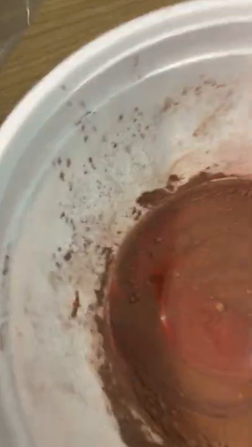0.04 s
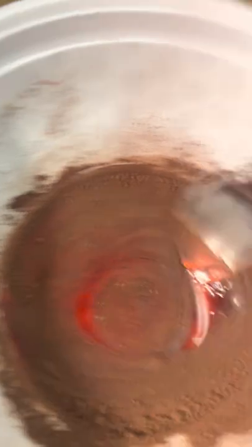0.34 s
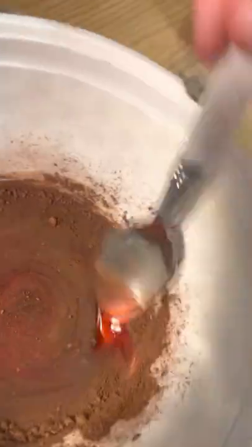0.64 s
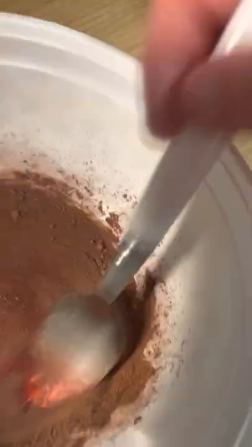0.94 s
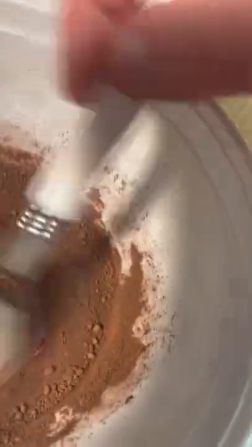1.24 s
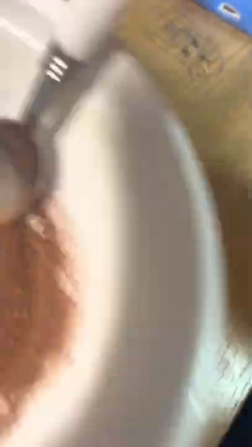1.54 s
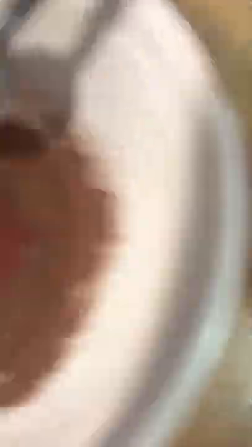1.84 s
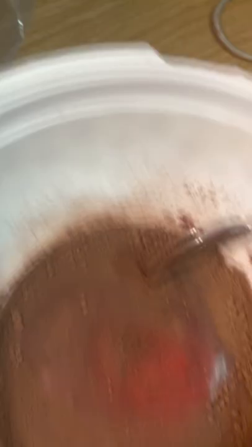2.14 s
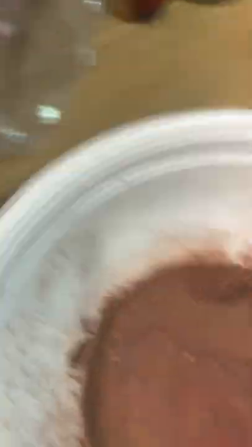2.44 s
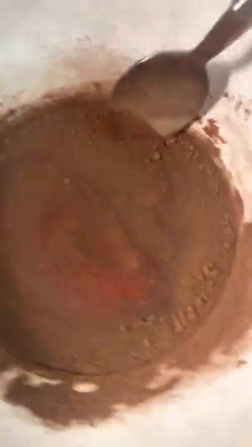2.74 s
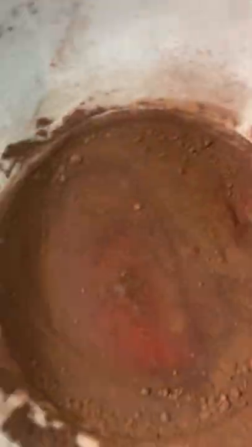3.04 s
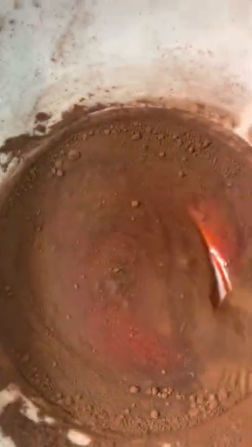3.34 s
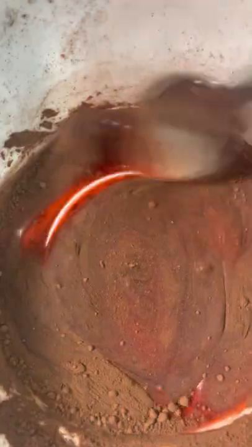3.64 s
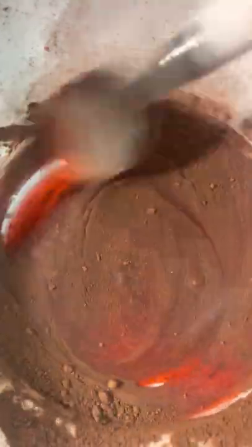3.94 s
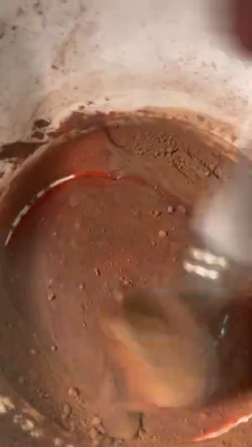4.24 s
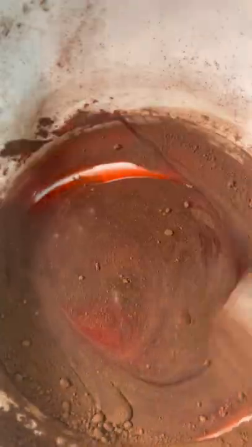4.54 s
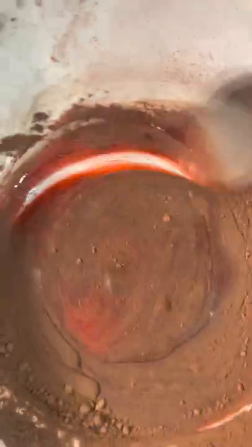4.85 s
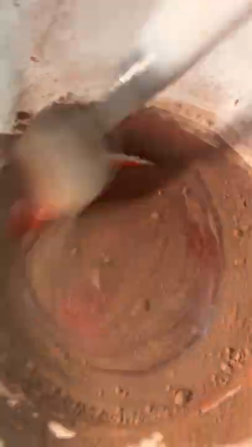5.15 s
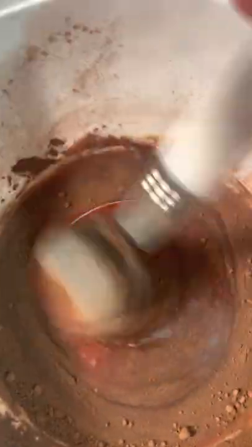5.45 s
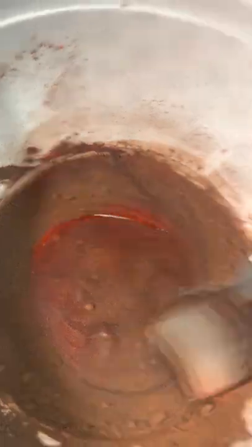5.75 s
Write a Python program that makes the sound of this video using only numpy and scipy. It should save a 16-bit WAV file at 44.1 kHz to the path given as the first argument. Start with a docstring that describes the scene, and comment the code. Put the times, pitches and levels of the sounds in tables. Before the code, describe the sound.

Close, uneven tapping and scraping of a spoon against a thin plastic bowl as it mixes cocoa powder into a paste.

```python
"""A faintly humming kitchen, close up: a metal spoon stirs cocoa powder into a thick paste in a thin
plastic bowl. Each knock runs through the wall as a bending wave, treble first, a short falling "tock",
and some set the bowl rocking. Between knocks, in short pushes, the spoon grinds over powder and drags
along the wall, while air pockets in the paste crackle and gulp."""
import sys
import numpy as np
from scipy import signal
from scipy.fft import rfft, irfft, next_fast_len
from scipy.io import wavfile
from scipy.ndimage import uniform_filter1d, map_coordinates

SR = 44100
rng = np.random.default_rng(int(sys.argv[2]) if len(sys.argv) > 2 else 0)


def output_pcm(signal):
    """Save a mono or channel-first signal as 16-bit PCM at the path in sys.argv[1].

    Samples are clipped to [-1, 1] before scaling.
    """
    pcm = np.clip(np.atleast_2d(signal).T, -1, 1) * 32767
    wavfile.write(sys.argv[1], SR, np.round(pcm).astype(np.int16))


N = 255780  # 5.8 s
TIME_S = np.arange(N) / SR


def amp(db):
    """Decibels to gain."""
    return 10 ** (np.asarray(db) / 20)


def unit(x):
    """Scale to rms 1."""
    return x / np.sqrt(np.mean(x ** 2) + 1e-20)


def along(points, hz):
    """Read (frequency, value) points on a log axis."""
    freqs, values = np.transpose(points)
    return np.interp(np.log(hz + 1), np.log(freqs + 1), values)


def wobble(rate_hz):
    """Smooth random curve, rate_hz knots a second."""
    return map_coordinates(rng.standard_normal(int(N * rate_hz / SR) + 4), [TIME_S * rate_hz])


def filtered(x, response):
    """Apply a complex frequency response."""
    size = next_fast_len(N + SR // 2)
    return irfft(rfft(x, size) * response(np.fft.rfftfreq(size, 1 / SR)), size)[..., :N]


def band(hz, lo_hz, hi_hz, order=4):
    """Band-pass gain with smooth skirts."""
    return ((1 + (lo_hz / (hz + 1)) ** (2 * order)) * (1 + (hz / hi_hz) ** (2 * order))) ** -.5


def resonance(hz, centre_hz, q):
    """Gain of one damped resonance."""
    ratio = (hz + 1) / centre_hz
    return (1 + (q * (ratio - 1 / ratio)) ** 2) ** -.5


def causal(gain):
    """Minimum-phase response with this gain."""
    cepstrum = irfft(np.log(np.maximum(gain, 1e-6)))
    half = len(cepstrum) // 2
    return np.exp(rfft(np.r_[cepstrum[0], 2 * cepstrum[1:half], np.zeros(half)]))


def bending(hz, delay_s):
    """Bending-wave path: speed goes as the root of frequency; delay_s holds at 1 kHz."""
    return np.exp(-4j * np.pi * delay_s * np.sqrt(1000 * hz))


def add(track, start_s, sound):
    """Mix a sound into a track."""
    part = track[max(round(start_s * SR), 0):][:len(sound)]
    part += sound[:len(part)]


def bump(db, hz, rise_s, t60_s):
    """Soft tone that swells and dies."""
    t = np.arange(SR // 3) / SR
    return amp(db - 60 * t / t60_s) * (1 - np.exp(-(t / rise_s) ** 2)) * np.sin(2 * np.pi * hz * t)


def pushes(rows, arch_db=0.5):
    """Gain curve: each push builds, arches as it swells or eases, then fades; slopes in s per 20 dB."""
    track = np.zeros(SR + N)  # 1 s of lead-in
    for start_s, length_s, db, swell_db, rise_s, fade_s in rows:
        t = np.arange(-3 * rise_s, length_s + 3 * fade_s, 1 / SR)
        progress = np.clip(t / length_s, 0, 1)
        body_db = swell_db * (progress - .5) + arch_db * (np.sin(np.pi * progress) - .5)
        skirt_db = -20 * (np.maximum(-t, 0) / rise_s + np.maximum(t - length_s, 0) / fade_s)
        add(track, 1 + start_s - 3 * rise_s, amp(db + body_db + skirt_db))
    return track[SR:]


# Room noise spectrum: (frequency [Hz], level [dB])
AIR_SPECTRUM = [(25, -17), (52, -3), (120, -4), (180, -6.5), (280, -14), (800, -34.5), (2200, -39),
                (8000, -61)]


def kitchen(hum_hz=57, hum_db=-47, air_db=-38):
    """Low room noise and the wavering hum of an appliance."""
    air = unit(filtered(rng.standard_normal(N), lambda hz: amp(along(AIR_SPECTRUM, hz))))
    phase = 2 * np.pi * hum_hz * TIME_S + 0.8 * wobble(4.03)
    return amp(air_db) * air + amp(hum_db + 1.1 * wobble(4.4)) * np.sin(phase)


def reverb(x, t60_s=0.16):
    """Room reflections: a short noise tail after a 4 ms gap."""
    t = np.arange(SR // 2) / SR
    tail = rng.standard_normal(len(t)) * amp(-60 * t / t60_s) * (t > .004)
    return signal.fftconvolve(x, tail / np.linalg.norm(tail))[:N]


def shove(start_s=1.535, length_s=0.06254, db=-26, rise_s=0.015, fade_s=0.12):
    """The hardest push shifts the bowl: its base judders over the table."""
    judder = unit(filtered(rng.standard_normal(N), lambda hz: band(hz, 55, 150)))
    return pushes([(start_s, length_s, db, 0, rise_s, fade_s)]) * judder


# Landings that rock the bowl: (time [s], level [dB])
ROCKS = [(0.212, -17.5), (0.864, -23), (1.14, -17), (3.234, -16.5), (3.781, -15), (4.226, -14), (4.63, -11),
         (4.999, -16), (5.462, -15.5)]


def rocking(rock_hz=102.2):
    """The bowl sways after the spoon lands."""
    track = np.zeros(N)
    for start_s, db in ROCKS:
        add(track, start_s, bump(db, rock_hz, rise_s=0.016, t60_s=0.18))
    return track


# Pockets opening behind the spoon: (time [s], level [dB], pitch [Hz])
GULPS = [(0.763, -22.5, 533), (1.646, -13.5, 425), (2.239, -13.5, 250), (2.69, -15, 396.5),
         (3.686, -21, 696), (4.397, -25, 618), (4.88, -22, 610)]


def gulps():
    """Large air pockets ring briefly as the paste lets go."""
    track = np.zeros(N)
    for start_s, db, hz in GULPS:
        add(track, start_s, bump(db, hz, rise_s=0.00261, t60_s=0.063))
    return track


def pops(rate_hz=85, centre_hz=2200, spread=.38, decay_cycles=2.2):
    """Small air pockets open in the sticky paste; each rings a few cycles at its own pitch."""
    track, t = np.zeros(N), np.arange(512) / SR
    count = int(rate_hz * N / SR)
    for start_s, (pitch, strength) in zip(rng.uniform(0, N / SR, count), rng.standard_normal((count, 2))):
        cycles = centre_hz * np.exp(spread * pitch) * t
        envelope = np.exp(spread * np.tanh(strength) - cycles / decay_cycles)
        add(track, start_s, envelope * np.sin(2 * np.pi * cycles))
    return unit(track)


def fizz_gain(stop_s=5.5):
    """Once well stirred, the paste fizzes faintly: a gain that creeps up, then stops."""
    return amp(np.interp(TIME_S, (0, 5, stop_s), (-114.25, -64.25, -62.3))) * (TIME_S < stop_s)


# Bowl peaks and dips, before and after the turn: (frequency [Hz], gain [dB])
EARLY_RINGS = [(1250, 2.5), (1620, 3), (1980, -4), (2400, 2), (2650, 2), (3590, 3), (4280, 5), (5700, 6),
               (6600, 3), (7380, 3)]
LATE_RINGS = [(1610, 5), (2000, -8), (2400, -1), (3160, 6), (4000, 7), (5740, 6), (6680, 4.5), (7400, 4)]


def bowl_colour(x, width_hz=210, turn_s=(2.3, 2.9765)):
    """Bowl resonances colour knocks and scrapes; they crossfade as the spoon is taken round."""
    def ringing(rings):
        def response(hz):
            peaks_db = sum(db / (1 + (2 * (hz - ring_hz) / width_hz) ** 2) for ring_hz, db in rings)
            return causal(amp(peaks_db - 1.5))
        return filtered(x, response)

    late = np.interp(TIME_S, turn_s, (0, 1))
    return (1 - late) * ringing(EARLY_RINGS) + late * ringing(LATE_RINGS)


# Rubbing spectrum: (frequency [Hz], density [dB])
RUB_SPECTRUM = [(120, -13.5), (300, 6), (500, 4.5), (1050, -2.5), (1900, -14), (2400, -0.5), (3100, -5),
                (3700, -11.5), (4800, -11), (10500, -4), (14000, -5.5)]


def friction(lo_hz, hi_hz, rate_hz, spread_db, rub_gain, flutter_db, patchy_db, tone=None):
    """Tiny uneven slips on a smooth rub, radiated through the wall."""
    def wall(hz):
        return causal(amp(along(RUB_SPECTRUM, hz)) * band(hz, lo_hz, hi_hz)) * bending(hz, 0.001175)

    slips = (rng.random(N) < rate_hz / SR) * rng.standard_normal(N)
    slips *= amp(spread_db * np.clip(rng.standard_normal(N), -2, 2))
    force = (unit(slips) + rub_gain * rng.standard_normal(N)) * amp(flutter_db * wobble(110))
    # resonances shift as the contact point travels
    hz, frame_s, spectra = signal.stft(force, SR, nperseg=512)
    patches = uniform_filter1d(rng.standard_normal(spectra.shape), 4, axis=0)
    patches = uniform_filter1d(patches, 9, axis=1)
    spectra *= amp(patchy_db * unit(patches))
    if tone:
        peak = resonance(hz[:, None], np.interp(frame_s, *np.transpose(tone)), q=0.95)
        spectra *= peak / np.linalg.norm(peak, axis=0)
    force = signal.istft(spectra, nperseg=512)[1][:N]
    return unit(filtered(force, wall))


# Main wall resonance under the dragging spoon: (time [s], frequency [Hz])
DRAG_TONE = [(1.2, 637.6), (1.52, 860), (1.62, 515), (1.72, 337), (2.06, 765), (2.13, 1116), (2.26, 450),
             (2.39, 710), (2.6, 503), (2.7, 400), (2.92, 435), (3.0, 825.2), (3.6, 730), (5.3, 710)]
# Spoon pushes: (start [s], length [s], level [dB], drag offset [dB], hiss offset [dB],
# swell [dB], rise [s per 20 dB], fade [s per 20 dB])
STROKES = [(0.0, 0.15, -48.5, -8, 0.5, 4, .03, 0.023), (0.297, 0.0274, -41.5, 2.5, -2, -4, .01, 0.066),
           (0.412, 0.11, -43, -8.5, -1, 0.5, 0.042, 0.045),
           (0.629, 0.04947, -38.5, 0, -8.5, -7.5, 0.013, 0.15),
           (0.753, 0.066, -37.5, 3.5, -3, 8, 0.05105, 0.11126),
           (0.962, 0.03, -33.5, -3, -5.5, -4, 0.024, 0.04636),
           (1.04, 0.04626, -51.5, -7, -3.5, 20, .04, 0.011),
           (1.135, 0.076, -31.5, -10, -5, 7.5, 0.013, 0.032),
           (1.322, 0.031, -29.5, -1, -9, 0, 0.059, 0.076), (1.48, 0.15, -29.5, 7.5, -11.5, 0, .05, 0.076),
           (2.076, 0.09, -29.5, 14, -9.5, 0, 0.055, 0.063), (2.313, .075, -36, -11, 2, 11, 0.1, 0.024),
           (2.385, .018, -33, 6, -8, 0, .03, .03), (2.499, 0.21, -40, 14, -3.5, 3.5, 0.054, .055),
           (2.889, 0.04659, -39.5, 9.5, -4.5, 5, 0.057, 0.021),
           (2.989, 0.018, -39, 8.5, -13, 2.5, 0.038, 0.014), (3.247, 0.076, -55.5, -7.5, 7, 0, .01, 0.15),
           (3.345, .008, -33, 3, -6, 2, 0.023, .008), (3.37, .045, -42, 5, -2, -3, .01, .03),
           (3.465, 0.073, -38, 2.5, 4, -9, 0.03, .05), (3.596, 0.07, -32.5, -3, -1.5, -3.5, .03, 0.04),
           (3.736, 0.00712, -33.5, -1, -4, 6.5, 0.02291, 0.006045),
           (3.803, 0.12, -39.5, -1, 5.5, 6, 0.022, 0.17), (3.998, 0.14, -38, 0.5, -14, -10.5, .03, .045),
           (4.264, .105, -41, 6, -2, -6, 0.038, 0.098), (4.413, 0.1, -36, -0.5, -5, 1, 0.053, 0.0067),
           (4.693, 0.21, -39.5, 4, -2.5, 2, 0.11, 0.022), (5.072, 0.042, -39, 2.5, 1, 0, 0.096, 0.01),
           (5.154, .125, -34.5, 5, -5.5, -7.5, 0.012, .08), (5.51, 0.074, -33, -1, -5, -3, 0.021, 0.075),
           (5.644, 0.036, -40, -1.5, -13, -9.5, 0.012, .018),
           (5.754, 0.03, -31.5, 0.5, -10, 0.5, 0.0046, 0.18)]


def stirring(drag_linger=1.18, crackle_duck=.8):
    """The spoon drags on the wall, scrapes over grit, shears dry powder and tears sticky paste."""
    start_s, length_s, db, drag_db, hiss_db, swell_db, rise_s, fade_s = np.transpose(STROKES)

    def gain(offset_db, linger=1):
        return pushes(zip(start_s, length_s, db + offset_db, swell_db, rise_s, fade_s * linger))

    drag = friction(165, 1830, rate_hz=500, spread_db=2, rub_gain=.91, flutter_db=1.5, patchy_db=1,
                    tone=DRAG_TONE)
    scrape = friction(1250, 4600, rate_hz=450, spread_db=3.5, rub_gain=.7, flutter_db=2.8, patchy_db=2.8)
    hiss = friction(3640, 20940, rate_hz=1400, spread_db=3.5, rub_gain=.91, flutter_db=3, patchy_db=5.5)
    fizz = fizz_gain()
    crackle_db = -4 - crackle_duck * np.maximum(drag_db, 0)  # heavy drag, less crackle
    return (gain(drag_db - 1.6, drag_linger) * drag
            + (gain(-2.3) + fizz) * scrape
            + (gain(hiss_db + 3) + fizz) * hiss
            + gain(crackle_db) * pops())


def contact(knock_db, clack_db, tick_db, knock_hz, clack_hz, travel_s=.0011, rim_gain=0.68, size=4096):
    """One contact sends a falling chirp through the wall; weaker ones return from the rim."""
    hz, t = np.fft.rfftfreq(size, 1 / SR), np.arange(size) / SR
    path_s = travel_s * np.exp(0.1694 * rng.standard_normal())
    waves = bending(hz, path_s) + rim_gain * bending(hz, path_s * rng.uniform(2.406, 3.0))
    waves += rim_gain ** 2 * bending(hz, path_s * rng.uniform(4, 8))
    # a light, bright contact skids over grit
    grit = rng.standard_normal(size) * np.exp(-t / 0.0076)
    skid_db = 3 + tick_db - max(knock_db, clack_db)
    force = 1 + amp(skid_db) * rfft(grit / np.linalg.norm(grit))
    knock = (resonance(hz, knock_hz, q=4.2) + 0.23) * band(hz, 94, 950, order=3)
    # paste damps the spoon's ring within milliseconds; a softer contact has a lower top
    clack = resonance(hz, clack_hz, q=1.5) + resonance(hz, clack_hz, q=9)
    clack *= band(hz, 1150, 1.8 * clack_hz + 600)
    tick = band(hz, 4900, 12500) * resonance(hz, 6200, q=.6)
    # each part is scaled to its own energy
    parts = [(knock_db + 26, knock), (clack_db + 21.5, clack), (tick_db + 20.5, tick)]
    power = sum((amp(db) * shape / np.linalg.norm(irfft(shape * waves * force))) ** 2
                for db, shape in parts)
    return irfft(causal(np.sqrt(power)) * waves * force)


# Spoon on wall, relative levels:
# (time [s], wall knock [dB], spoon clack [dB], contact tick [dB], knock [Hz], clack [Hz])
KNOCKS = [(0.1915, -24.5, -26, -35, 493, 2970), (0.286, -22.5, -25, -31, 840, 2180),
          (0.5976, -22.5, -21.5, -35, 557.3, 4300), (0.6179, -18, -20.5, -45, 656, 2180),
          (0.8551, -19, -28, -38, 463, 3390), (0.9013, -17, -23.5, -38, 450, 1480),
          (0.9523, -21, -22, -42, 453, 1270), (1.1125, -24, -17, -24, 375, 2924),
          (1.5307, -10, -14, -26, 405.4, 2620), (1.5668, -7, -17, -24, 323, 2735),
          (1.6188, -15, -17.5, -22.5, 440, 2430), (1.9973, -13.5, -13, -19.5, 900, 2056),
          (2.0008, -11.5, -13.5, -28, 456.7, 3120), (2.236, -14.5, -18.5, -23.5, 930, 2042),
          (2.2405, -22.5, -29, -21.5, 341.1, 1610), (2.7654, -24, -16, -32, 750, 1850),
          (3.2266, -17, -24.5, -31, 500, 2480), (3.362, -5, -16, -24, 547, 3974),
          (3.4752, -21.5, -36, -45, 569, 2000), (3.5796, -23, -37, -28, 630, 1990),
          (3.7716, -15, -17, -29, 617, 2400), (3.8554, -8, -8.5, -29.5, 525, 1830),
          (3.9738, -22.5, -26.5, -33, 540, 1740), (3.9996, -24, -18, -29, 870, 1779),
          (4.0464, -25, -24.5, -39, 514.4, 1718), (4.121, -24, -26.5, -31.5, 580, 3750),
          (4.2171, -13, -19.5, -26.5, 506, 2044), (4.297, -21, -29.5, -51, 560, 1683),
          (4.336, -7.5, -20.5, -25, 837.3, 2250), (4.348, -16, -30, -38, 489.5, 2460),
          (4.6201, -19, -20, -27.5, 554, 2030), (4.6372, -19.5, -24, -23, 436, 2120),
          (4.6804, -9.5, -8.5, -24.5, 515, 1950), (4.7964, -27, -35, -44, 618, 2151),
          (4.9943, -18, -20, -35, 630, 2400), (5.0058, -23, -30, -38, 584, 1900),
          (5.0676, -9, -9, -32, 620, 1735), (5.2639, -19, -49.5, -65, 465.1, 2660),
          (5.4487, -18.5, -24, -36, 569.4, 1890), (5.4532, -24.5, -18.5, -38, 636, 1958),
          (5.4794, -23, -29, -31.5, 600, 1810)]
# Light clicks of the spoon's edge: (time [s], relative level [dB], clack [Hz])
CLICKS = [(0.0925, -26, 2514), (0.1447, -32, 5470), (0.1575, -25.5, 5140), (0.2968, -23.5, 2323),
          (0.813, -20.5, 2669), (0.8348, -22, 2020), (3.403, -25, 4170), (3.7797, -27, 2430),
          (3.829, -30, 7100), (4.654, -27, 4448), (4.8207, -25.5, 1430), (5.223, -21.5, 1940)]


def knocks():
    """Full knocks of the spoon, and edge clicks that hardly move the wall."""
    track = np.zeros(N)
    for start_s, *blow in KNOCKS:
        add(track, start_s, contact(*blow))
    for start_s, db, hz in CLICKS:
        click = contact(knock_db=db - 19.5, clack_db=db, tick_db=db - 11, knock_hz=800, clack_hz=hz)
        add(track, start_s, click)
    return track


# Left microphone over right: (frequency [Hz], level [dB])
BALANCE = [(200, 0), (500, -1.5), (1500, 0), (2900, -2), (3800, 0), (4800, -3), (5500, 0)]
# Left microphone ahead of right: (frequency [Hz], phase [rad])
PHASE_LEAD = [(1400, 0), (3300, 1), (4100, 1), (4650, 2.1), (5200, 5.1), (5900, 6.3), (8750, 9.3),
              (9550, 9.55), (12200, 12.4)]


def scene(room_db=-16):
    """Bowl and kitchen reach two close microphones; each gets its own room tail."""
    def mic_pair(hz):
        sides = np.array([[.5], [-.5]])
        lead_rad = np.interp(hz, *np.transpose(PHASE_LEAD))
        return amp(sides * along(BALANCE, hz)) * np.exp(1j * sides * lead_rad)

    bowl = bowl_colour(knocks() + stirring()) + gulps() + rocking() + shove()
    direct = filtered(bowl + kitchen(), mic_pair)
    room = filtered(np.array([reverb(bowl), reverb(bowl)]), lambda hz: band(hz, 210, 5700, order=1))
    return direct + amp(room_db) * room


# Microphone response: (frequency [Hz], gain [dB])
MIC_RESPONSE = [(20, -21), (45, -1.5), (11000, 1), (12000, -6), (14000, -32), (16000, -48)]


def record(dry, cutoff_hz=15500):
    """The microphones lose the top octave; the loudest knocks are rounded off."""
    x = filtered(dry, lambda hz: amp(along(MIC_RESPONSE, hz)))
    rounded = x / (1 + np.abs(x) ** 6) ** (1 / 6)
    return filtered(rounded, lambda hz: hz < cutoff_hz)


dry = scene()
out = record(dry)
output_pcm(out)
```